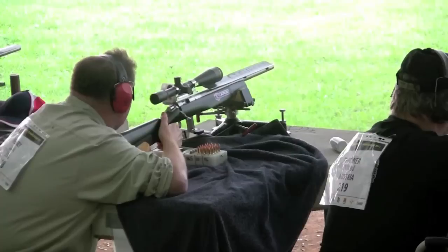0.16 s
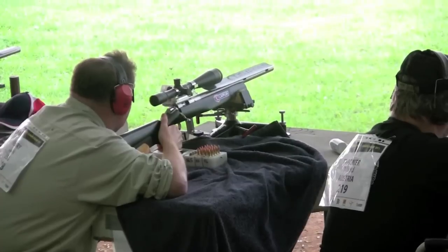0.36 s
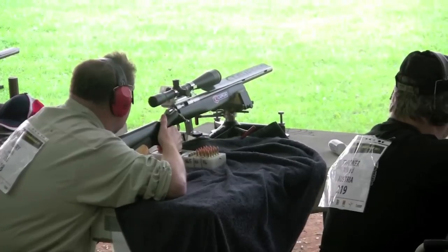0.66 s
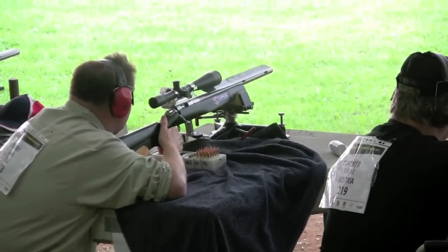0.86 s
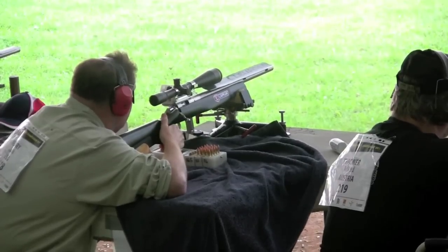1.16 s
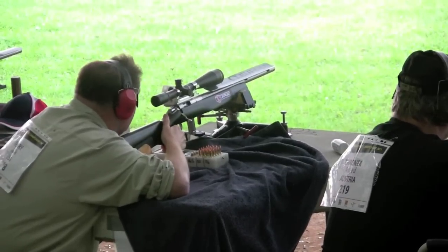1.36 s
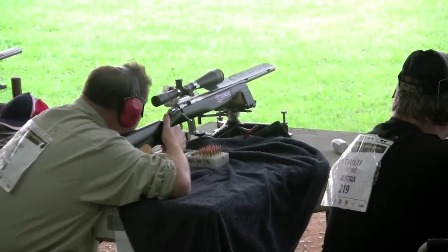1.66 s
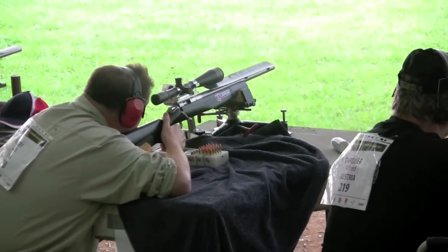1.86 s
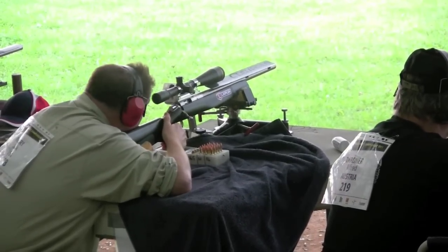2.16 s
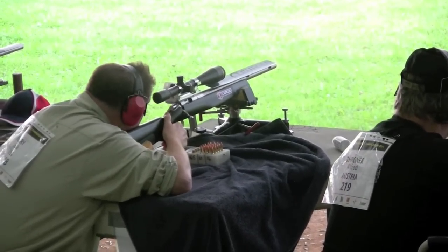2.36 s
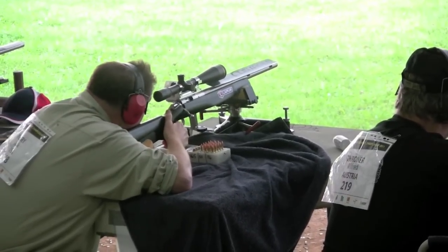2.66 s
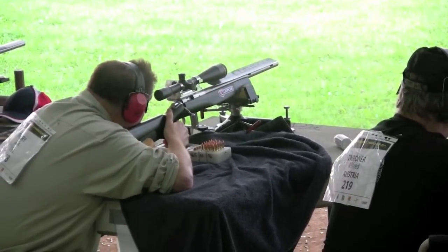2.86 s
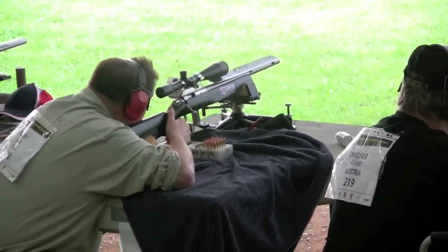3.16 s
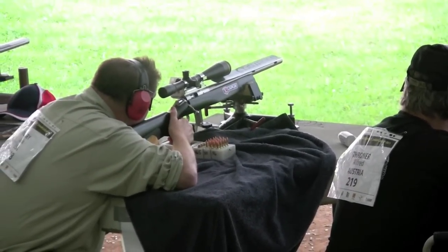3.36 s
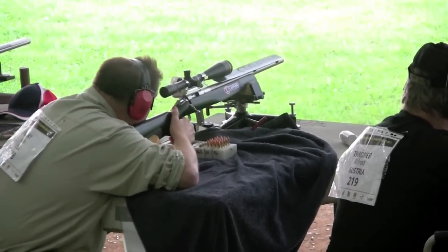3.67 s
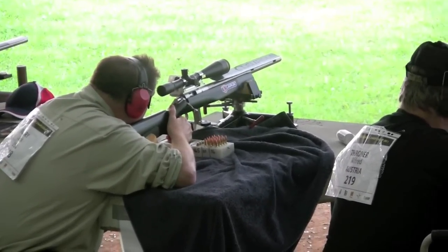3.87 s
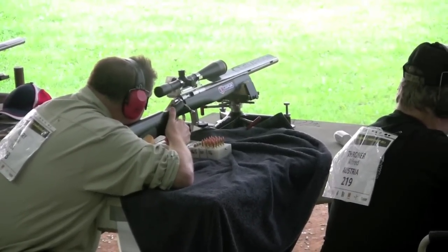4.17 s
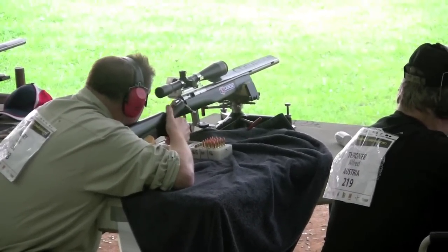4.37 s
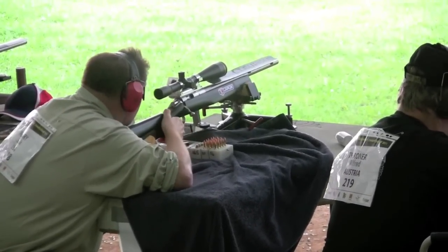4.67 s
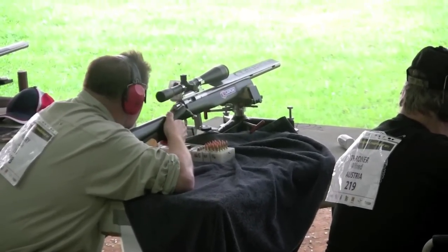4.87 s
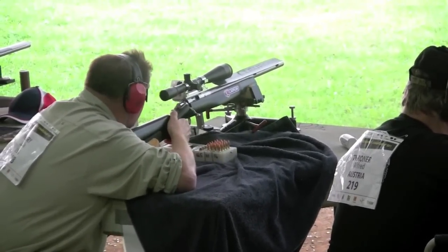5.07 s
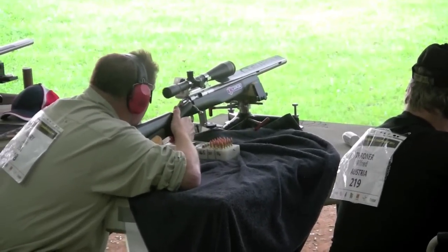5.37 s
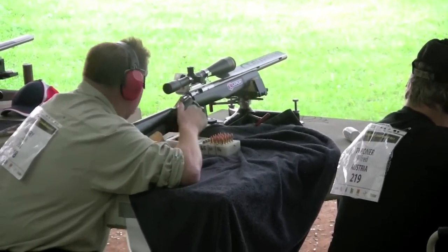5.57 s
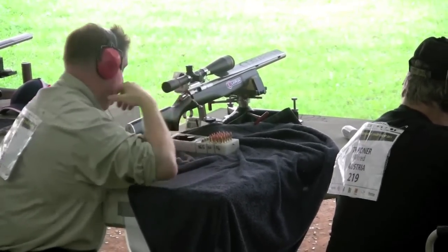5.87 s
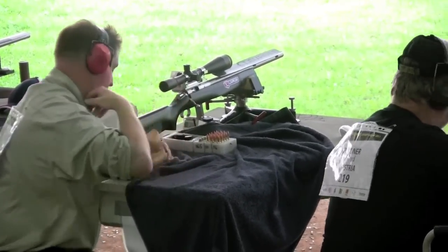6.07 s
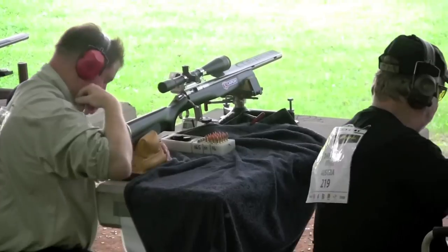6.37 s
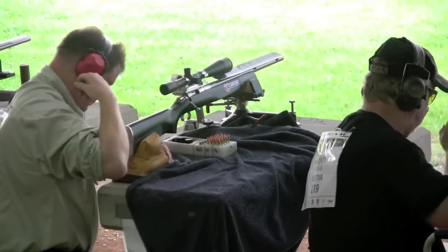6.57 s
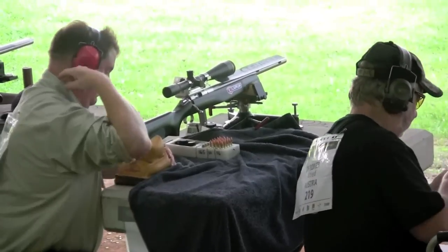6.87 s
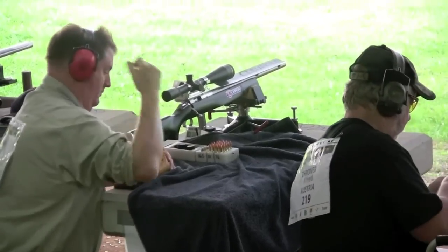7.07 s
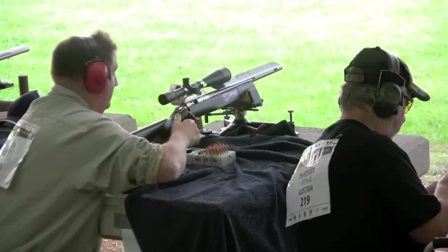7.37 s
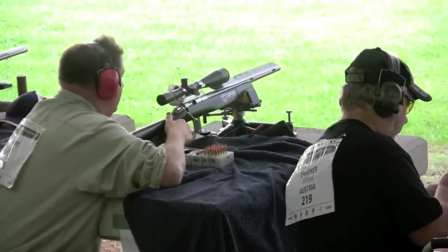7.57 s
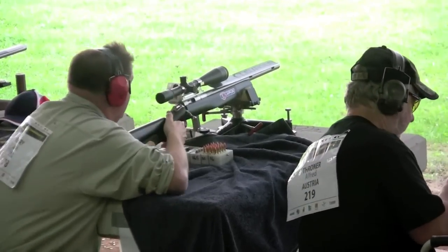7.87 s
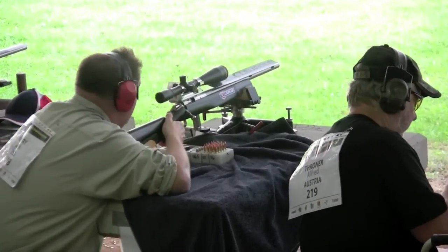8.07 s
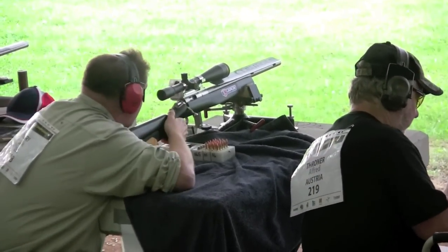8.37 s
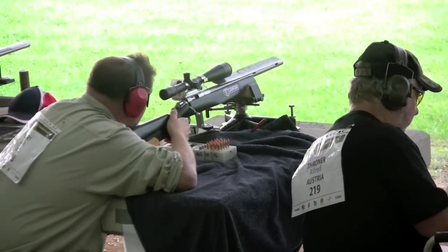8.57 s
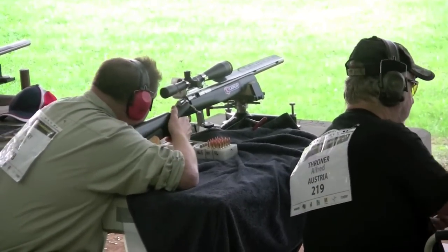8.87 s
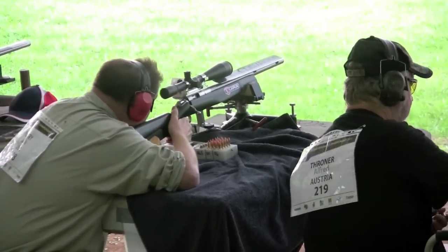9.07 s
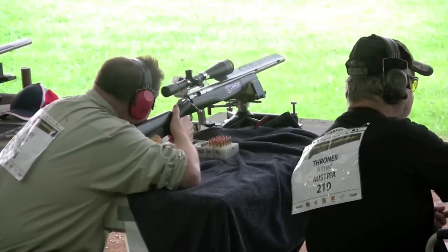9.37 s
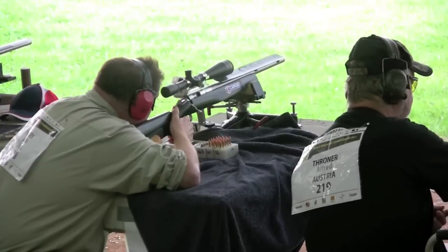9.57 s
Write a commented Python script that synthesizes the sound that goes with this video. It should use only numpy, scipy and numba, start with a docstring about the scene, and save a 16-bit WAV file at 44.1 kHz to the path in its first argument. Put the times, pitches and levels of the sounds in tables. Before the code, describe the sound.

Rifles near and farther along a covered bench line fire eleven times in ten seconds, unevenly spaced. Cracks and blunt booms overload the microphones, then ring under the roof and roll off wooded slopes. Small gear clicks, soft cloth rustles and very faint high whistles fill gaps. A steady low hum rises as levels recover; the last shot is answered by a loud, sharp slap from downrange.

```python
"""On an outdoor range, rifles fire along a roofed firing line, close to a camera's two microphones.
Each shot is a crack, a thump and a blast of shaped noise, then roof ring and a long roll from wooded slopes.
Gear knocks, sharp stray echoes, a loud late slap from downrange, cloth rustles and faint whistles join in.
The blasts overload the microphones; gain control ducks them, and a hum swells up as it recovers."""
import sys
import numpy as np
from scipy import signal
from scipy.io import wavfile
from scipy.ndimage import uniform_filter1d, minimum_filter1d
from numba import njit

SR = 44100
rng = np.random.default_rng(int(sys.argv[2]) if len(sys.argv) > 2 else 0)


def unload_audio(sound):
    """Save the sound as a 16-bit wav file, at the path given as the first command line argument."""
    columns = np.transpose(np.atleast_2d(sound))
    # keep every value between -1 and 1, then stretch to whole-number steps
    steps = np.round(np.clip(columns, -1, 1) * 32767)
    wavfile.write(sys.argv[1], SR, steps.astype(np.int16))


N = 429093  # length in samples
FRAME, OVERLAP = 1024, 768  # spectral frames, in samples
BINS = np.fft.rfftfreq(FRAME, 1 / SR)[:, None]  # Hz


def gain_of(db):
    """Decibels to amplitude."""
    return 10 ** (np.asarray(db) / 20)


def read(points, hz):
    """Joins the points of a table on a log-frequency axis."""
    f, value = np.transpose(points)
    return np.interp(np.log(hz + 1), np.log(f + 1), value)


def evened(x):
    """Scales to an rms of one."""
    return x / np.sqrt(np.mean(x ** 2) + 1e-20)


def wander(shape, size):
    """Smoothed random drift of unit rms along the last axis, for unsteady levels and pitches."""
    return evened(uniform_filter1d(rng.standard_normal(shape), size=size))


def colour(points):
    """Gains per bin, of unit power, for a spectrum table."""
    return evened(gain_of(read(points, BINS)))


def decay(t, t60):
    """Exponential die-away that falls 60 dB in t60 seconds; full level before time zero."""
    return np.exp(-np.log(1000) * np.maximum(t, 0) / t60)


def add(mix, s, sound):
    """Mixes a stereo sound in at time s."""
    part = mix[:, max(round(s * SR), 0):][:, :sound.shape[1]]
    part += sound[:, :part.shape[1]]


# likeness of the two microphone signals: pitch_hz [Hz], likeness [0 to 1]
LEFT_RIGHT_LIKENESS = [(40, 0.5), (100, 0.97), (220, 0.96), (1200, 0.92), (3000, 0.84), (7000, 0.37),
                       (15000, 0.077)]


def noise(seconds, shape):
    """Noise at two close microphones, with gains shape(t) over frequency and time."""
    count = int(seconds * SR)
    white = rng.standard_normal((2, count + FRAME))
    _, t, (a, b) = signal.stft(white, SR, nperseg=FRAME, noverlap=OVERLAP)
    same = np.clip(read(LEFT_RIGHT_LIKENESS, BINS), 0, 1)
    mid = a * np.sqrt((1 + same) / 2)
    side = b * np.sqrt((1 - same) / 2)
    stereo = np.array([mid + side, mid - side]) * shape(t)
    return signal.istft(stereo, nperseg=FRAME, noverlap=OVERLAP)[1][:, :count]


def burst(gains, t60, rise):
    """A dense clump of noise that rises and dies within moments."""
    sound = noise(t60 + rise, lambda t: gains)
    t = np.arange(sound.shape[1]) / SR
    return sound * np.minimum(t / rise, 1) ** 2 * decay(t - rise, t60)


# spectrum of the outdoor air: pitch_hz [Hz], level_db [dB per Hz, relative]
AIR_SPECTRUM = [(30, -22), (80, -19), (160, -1), (280, -4), (450, -1.5), (1000, 1.5), (2500, -1),
                (6000, -16.5), (10000, -32), (16000, -33)]


def background(hum_hz=198, hum_db=-45, air_db=-34.5):
    """A steady machine hum, one sine, in outdoor air, a bed of shaped noise."""
    hum = evened(np.sin(2 * np.pi * hum_hz * np.arange(N) / SR))
    air = noise(N / SR + 1, lambda t: colour(AIR_SPECTRUM))[:, :N]
    return gain_of(hum_db) * hum + gain_of(air_db) * air


# thin high whistles: start_s [s], end_s [s], pitch_hz [Hz], level_db [dB rms]
WHISTLE_TONES = [(2.27, 2.41, 7000, -48), (8.25, 8.46, 7500, -50.5), (8.37, 8.70, 13250, -53)]


def whistles(waver_hz=110, flutter_db=4):
    """Faint, ragged tones high in the treble: sines whose pitch and level drift at random."""
    out = np.zeros((2, N))
    for start_s, end_s, pitch_hz, level_db in WHISTLE_TONES:
        count = max(int((end_s - start_s) * SR), 100)
        pitch = pitch_hz + waver_hz * wander(count, 70)
        flutter = gain_of(flutter_db * wander(count, 400))
        tone = np.sin(2 * np.pi * np.cumsum(pitch) / SR)
        tone = evened(tone * flutter * signal.windows.tukey(count, .5))
        add(out, start_s, gain_of(level_db) * np.array([tone, tone]))
    return out


# short hits: start_s [s], level_db [dB], pitch_hz [Hz, centre]
# the two near 3.3 s are sharp ticks in the roll: stray echoes of the crack off single trunks or frames
# the one at 9.184 s is a loud slap back from the far end, bullet strike or echo, after the last shot
# the others are small knocks and clicks of gear on the benches
SHORT_HITS = [(0.832, -32, 8000), (2.395, -28, 8600), (3.288, -15, 3600), (3.330, -10.5, 3600),
              (8.503, -31, 8300), (9.184, 1, 3600), (9.6, -25, 236)]
# soft rustles of sleeves and rest bags: start_s [s], end_s [s], level_db [dB rms]
CLOTH_RUSTLES = [(1.058, 1.196, -46), (2.37, 2.532, -46), (7.883, 8.095, -54), (8.432, 8.686, -49.5)]


def hits_and_rustles(sharpness=1.6, rustle_hz=9000, contact_s=.006, ring_cycles=70):
    """Knocks, stray echoes and a slap, each in one broad resonance; cloth rubs in tiny uneven slips."""
    def body(hz):
        """Power response of one broad resonance."""
        ratio = (BINS + 1) / hz
        return evened(1 / (1 + (sharpness * (ratio - 1 / ratio)) ** 2))

    out = np.zeros((2, N))
    for start_s, level_db, pitch_hz in SHORT_HITS:
        # a short contact plus a fixed number of cycles, so low hits ring longer
        t60 = contact_s + ring_cycles / pitch_hz
        hit = burst(evened(body(pitch_hz) ** 1.2), t60, rise=.001)
        add(out, start_s, gain_of(level_db) * hit)
    for start_s, end_s, level_db in CLOTH_RUSTLES:
        rub = noise(max(end_s - start_s, .02), lambda t: np.sqrt(body(rustle_hz)))
        slips = gain_of(1.8 * wander(rub.shape[1], 200))
        rustle = evened(rub * slips * signal.windows.tukey(len(slips), .5))
        add(out, start_s, gain_of(level_db) * rustle)
    return out


# spectra of roof ring and woods echo: pitch_hz [Hz], level_db [dB per Hz, relative]
ROOF_SPECTRUM = [(40, -54), (120, -9.5), (200, -2), (330, 3.5), (600, -2), (1100, -4), (1900, -5),
                 (4000, -13.5), (8000, -18.5), (16000, -30)]
WOODS_SPECTRUM = [(40, -18), (130, -0.5), (330, -1), (550, 1), (800, 4.5), (1200, 1), (1800, 0),
                  (2800, -1.5), (4200, -7), (6200, -12), (9000, -20), (16000, -41)]
# their decay times: pitch_hz [Hz], t60_s [s to fall 60 dB]
ROOF_DECAY = [(100, 0.73), (350, 0.57), (1500, 0.59), (6000, 0.58), (15000, 0.37)]
WOODS_DECAY = [(120, 1.29), (400, 0.9), (800, 1.63), (1600, 2.46), (3000, 2.27), (6000, 1.714),
               (10000, 1.15), (15000, 0.83)]


def rolling(roof_db, woods_db, hold_s=0.053, far_s=0.39, swell_s=0.055, near_slope_db=5, build_s=0.017):
    """The roof rings and dies; the woods answer until the farthest trees are reached, then fade."""
    def shape(t):
        # the ring holds while the blast still runs along the roof
        dying = decay(t - hold_s, read(ROOF_DECAY, BINS))
        # near_slope_db is the fall per second while nearer trees answer
        arriving = (1 - np.exp(-t / swell_s)) * gain_of(near_slope_db * np.maximum(far_s - t, 0))
        fading = decay(t - far_s, read(WOODS_DECAY, BINS))
        # separate reflectors make the echo patchy in time and pitch
        grain = uniform_filter1d(rng.standard_normal(fading.shape), size=6, axis=1)
        lumpy = gain_of(1.3 * evened(uniform_filter1d(grain, size=24, axis=0)))
        roof = gain_of(roof_db) * colour(ROOF_SPECTRUM) * dying
        woods = gain_of(woods_db) * colour(WOODS_SPECTRUM) * arriving * fading
        return lumpy * np.hypot(roof, woods)

    sound = noise(2.8, shape)
    return sound * np.minimum(np.arange(sound.shape[1]) / SR / build_s, 1)


def earlier_shot(age_s=0.94):
    """The woods are still rolling from a shot fired a little before."""
    out = np.zeros((2, N))
    add(out, 0, rolling(roof_db=24, woods_db=-5)[:, int(age_s * SR):])
    return out


SOUND_M_PER_S = 343
TYPICAL_DB = 26  # muzzle blast of a typical shot
# crack and echo of a typical shot, and the dB that they gain for each dB of stronger blast
CRACK_DB, CRACK_GROWTH = 21, 0.53
WOODS_DB, WOODS_GROWTH, WOODS_LOSS_DB_PER_M = -0.15, 0.23, 0.2128
# the far end of the range slaps each shot back: its delay, and its level over the echo from the woods
SLAP_DELAY_S, SLAP_DB = .497, -2.5
# spectra of bullet crack and muzzle blast: pitch_hz [Hz], level_db [dB per Hz, relative]
CRACK_SPECTRUM = [(100, -19), (700, -5.5), (1300, -3.5), (2200, -13.5), (5000, -19.5), (16000, -31.5)]
BLAST_SPECTRUM = [(40, -6), (110, -19), (190, 3.5), (300, -2.5), (460, 2.5), (750, -4.5), (1400, -6.5),
                  (3000, -18.5), (7000, -28), (16000, -25)]
# one row a shot: start_s [s], blast_db [dB], roof_db [dB, ring], distance_m [m along the firing line]
RIFLE_SHOTS = [(0.139, 33.5, 28, 4.9), (1.217, 26, 19, 8.5), (2.518, 33, 22, 5.1), (4.147, 39, 29.5, 14),
               (4.284, 24.5, 20.5, 16), (4.428, 12.5, 25, 18.4), (4.822, 12, 15, 13), (5.686, 24, 21.5, 12),
               (6.396, 23.5, 25, 16), (6.868, 31, 19.5, 29), (8.671, 29.5, 19.5, 4.5)]


def rifles(thump_hz=330, thump_t60=0.016, lag_s=.003, thump_db=4, blast_t60=.135):
    """The bullet's crack snaps up first; muzzle blast and bench and roof reflections swell, then echoes."""
    out, t = np.zeros((2, N)), np.arange(2048) / SR
    # the pressure wave swings the microphones for a few cycles
    thump = np.sin(2 * np.pi * thump_hz * t) * decay(t, thump_t60) * np.ones((2, 1))
    slap_colour = colour([(200, -20), (1500, 9.5), (5000, 2), (15000, -22)])
    for start_s, blast_db, roof_db, distance_m in RIFLE_SHOTS:
        # from farther along the line the roof holds longer, the woods answer less and the slap comes later
        excess_db = blast_db - TYPICAL_DB
        travel_s = abs(distance_m) / SOUND_M_PER_S
        crack_db = CRACK_DB + CRACK_GROWTH * excess_db
        woods_db = WOODS_DB + WOODS_GROWTH * excess_db - WOODS_LOSS_DB_PER_M * distance_m
        crack = burst(colour(CRACK_SPECTRUM), t60=0.093, rise=0.0013)
        blast = burst(colour(BLAST_SPECTRUM), blast_t60, rise=0.022)
        slap = burst(slap_colour, t60=0.042, rise=.002)
        add(out, start_s, gain_of(crack_db) * crack)
        add(out, start_s + lag_s, gain_of(blast_db + thump_db) * thump)
        add(out, start_s, gain_of(blast_db) * blast)
        add(out, start_s, rolling(roof_db, woods_db, travel_s))
        add(out, start_s + SLAP_DELAY_S + travel_s, gain_of(woods_db + SLAP_DB) * slap)
    return out


def scene():
    """Everything that reaches the two microphones."""
    return background() + whistles() + hits_and_rustles() + earlier_shot() + rifles()


def saturate(dry, overload_db, cross=0.016, gap_size=5):
    """Overloaded microphones; each side subtracts a little of the other, delayed, to widen the image."""
    bent = dry / (1 + abs(dry / gain_of(overload_db)) ** 1.5) ** (1 / 1.5)
    # the microphone's filters delay the treble unevenly, so the flattened wave tops ring
    _, poles = signal.iirpeak(7000, 1, fs=SR)
    bent = signal.lfilter(poles[::-1], poles, bent)
    treble = signal.lfilter(*signal.butter(2, 1500, "high", fs=SR), bent)
    return bent - cross * np.roll(treble[::-1], gap_size, axis=1)  # gap in samples


@njit
def follow(over, attack, release, held):
    """Gain reduction in dB: climbs fast while there is an excess, then sinks back slowly."""
    out = np.zeros(len(over))
    for i in range(len(over)):
        held = held + attack if over[i] > held else max(held - release, 0.)
        out[i] = held
    return out


def camera_drone():
    """The camera's own low drone: a sine in low rumble, whatever the gain."""
    spectrum = colour([(25, -33), (55, -5), (75, 11), (110, -8), (300, -35), (2000, -70)])
    rumble = noise(N / SR + 1, lambda t: spectrum)[:, :N]
    drone = evened(np.sin(2 * np.pi * 75.2 * np.arange(N) / SR))
    return gain_of(-61) * rumble + gain_of(-59.5) * drone


def record(dry, overload_db=17, target_db=-5, duck_db_per_s=900, recover_db_per_s=19.5, ceiling=0.53,
           low_cut_hz=85, start_db=7, preamp_db=3, edge_hz=15850):
    """The microphones saturate, gain control ducks, the converter clips what slips through; then band limit."""
    saturated = gain_of(preamp_db) * saturate(dry, overload_db)
    # the lowest negated level in a short window is the local peak
    peaks = -minimum_filter1d(-abs(saturated).max(0), size=16)
    over_db = 20 * np.log10(peaks + 1e-9) - target_db
    # the gain is already held down by start_db at the outset
    duck_db = follow(over_db, duck_db_per_s / SR, recover_db_per_s / SR, float(start_db))
    ducked = saturated * gain_of(-duck_db)
    clipped = ducked / (1 + (ducked / ceiling) ** 4) ** (1 / 4)
    clipped = signal.lfilter(*signal.butter(1, low_cut_hz, "high", fs=SR), clipped)
    # the second channel is slightly louder
    out = clipped * gain_of([[-.8], [.8]]) + camera_drone()
    band_limit = signal.firwin(255, edge_hz, window=("kaiser", 8), fs=SR)
    return signal.oaconvolve(out, band_limit[None], "same")


dry = scene()
out = record(dry)
unload_audio(out)
```